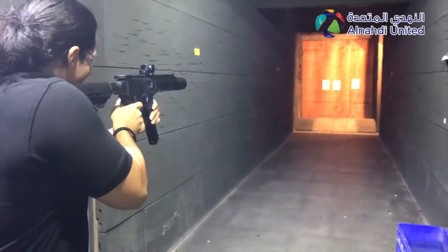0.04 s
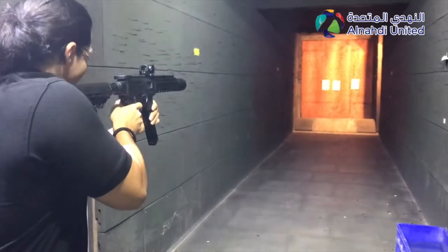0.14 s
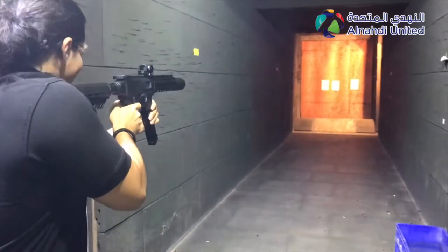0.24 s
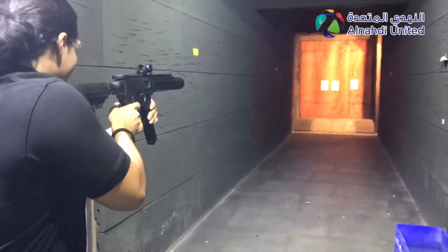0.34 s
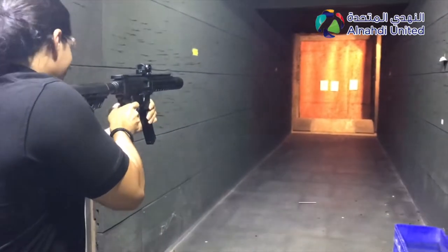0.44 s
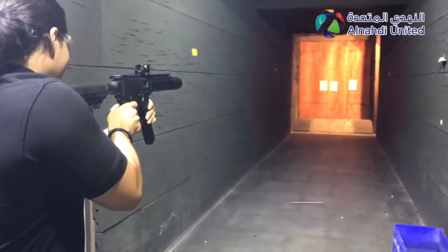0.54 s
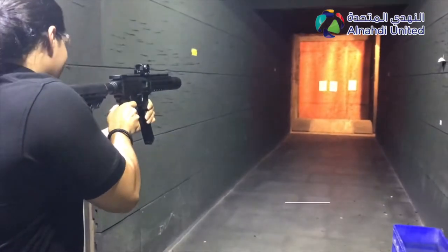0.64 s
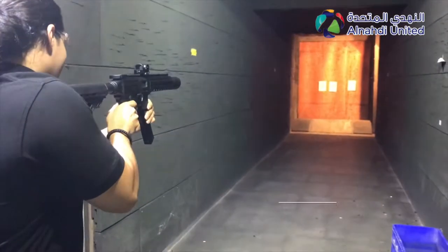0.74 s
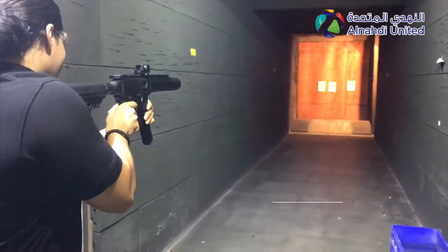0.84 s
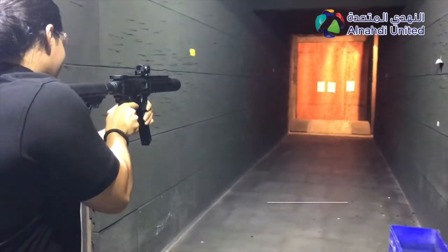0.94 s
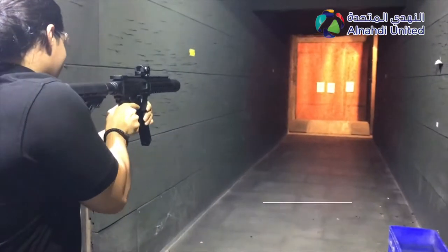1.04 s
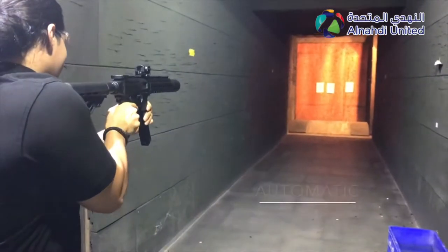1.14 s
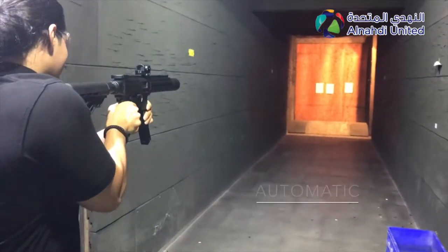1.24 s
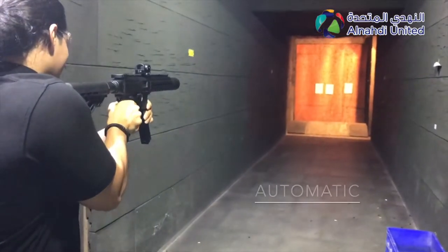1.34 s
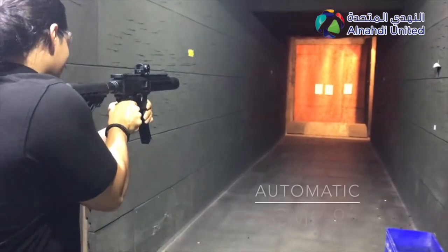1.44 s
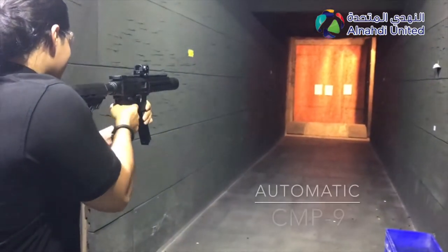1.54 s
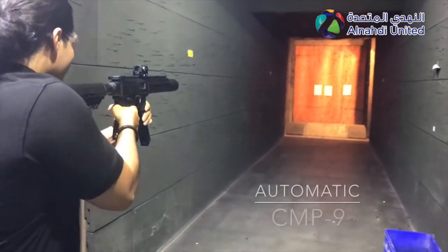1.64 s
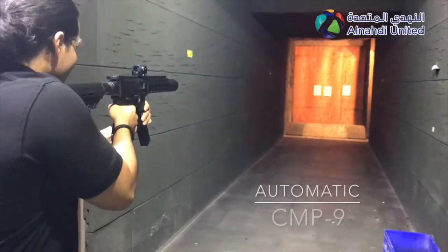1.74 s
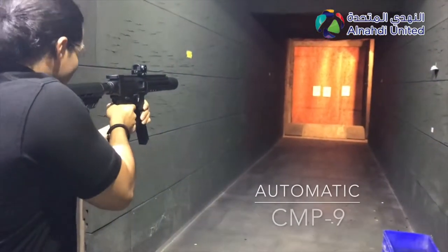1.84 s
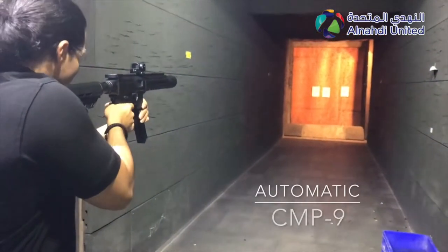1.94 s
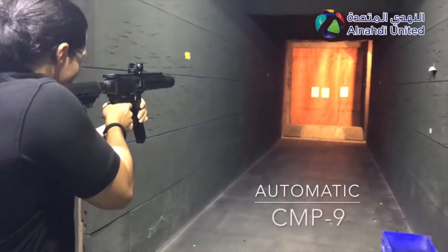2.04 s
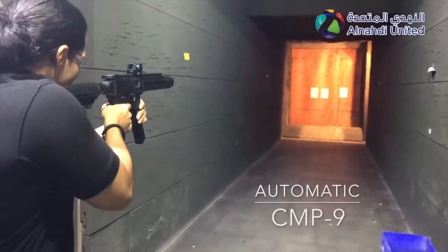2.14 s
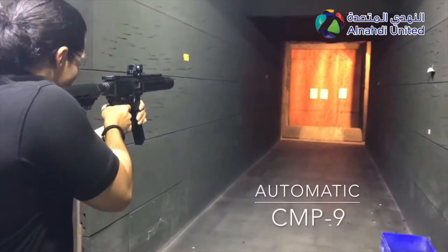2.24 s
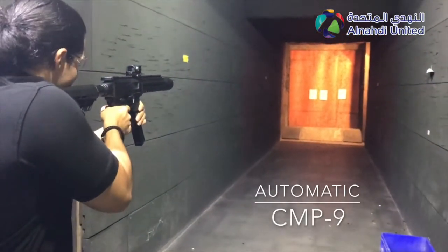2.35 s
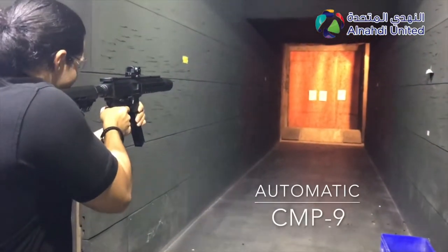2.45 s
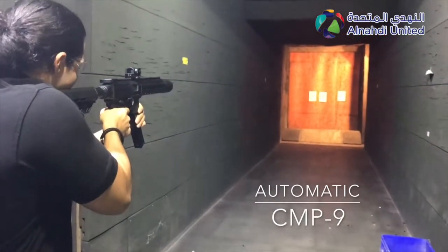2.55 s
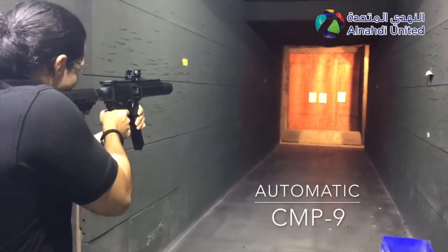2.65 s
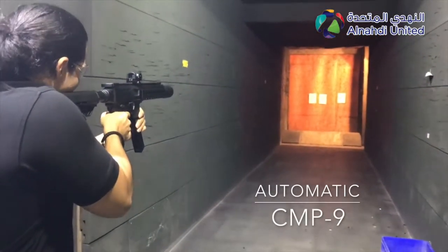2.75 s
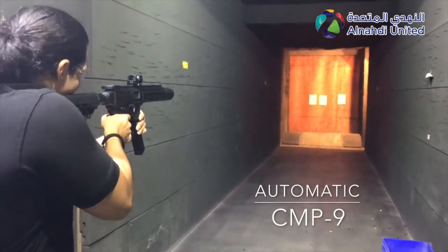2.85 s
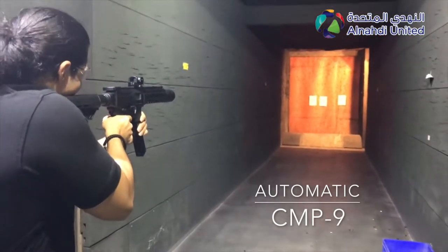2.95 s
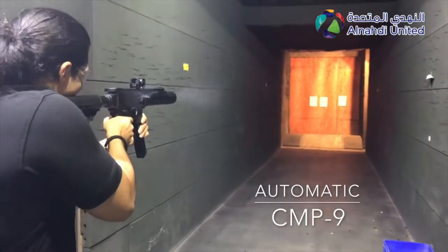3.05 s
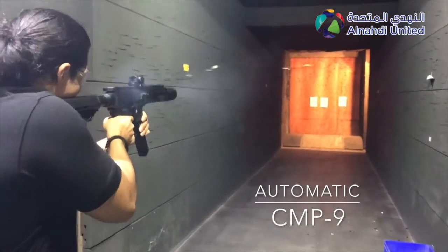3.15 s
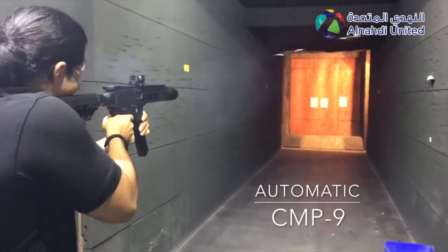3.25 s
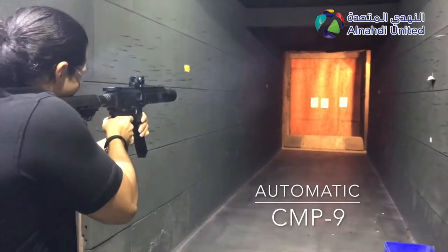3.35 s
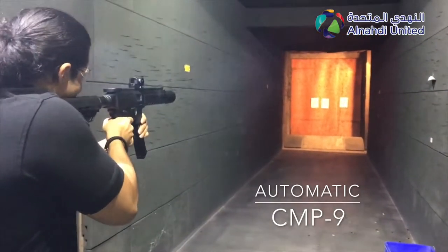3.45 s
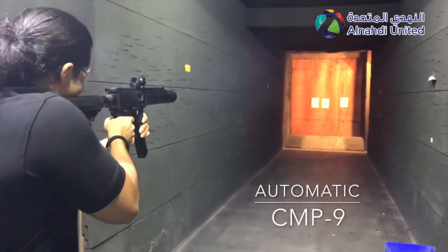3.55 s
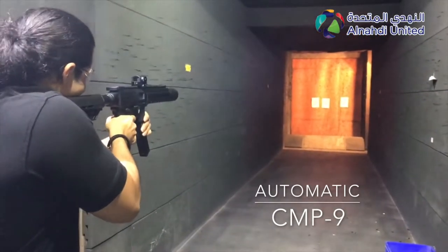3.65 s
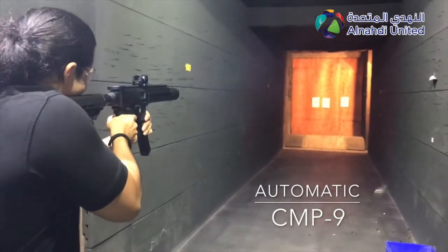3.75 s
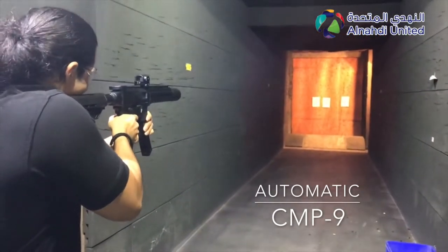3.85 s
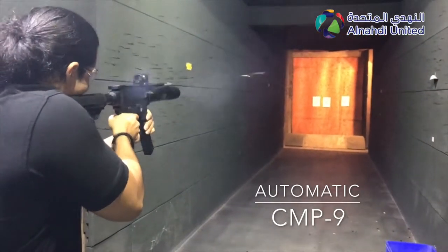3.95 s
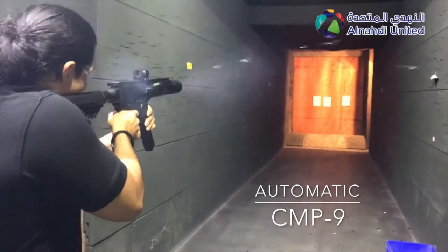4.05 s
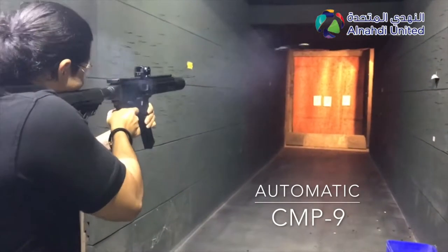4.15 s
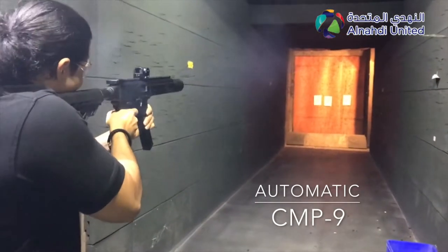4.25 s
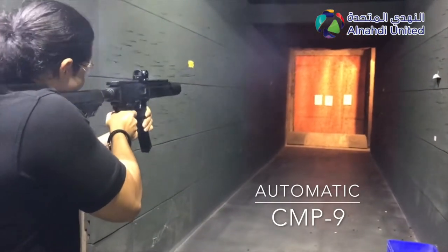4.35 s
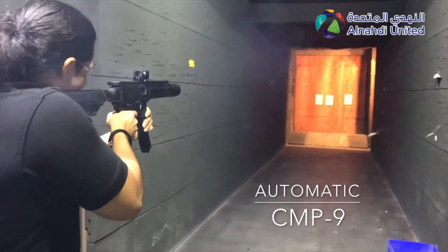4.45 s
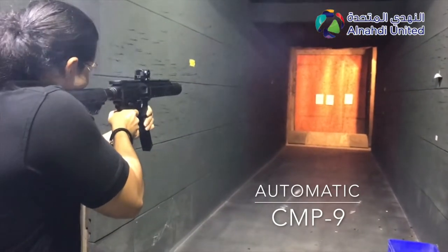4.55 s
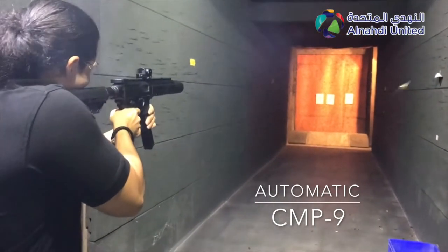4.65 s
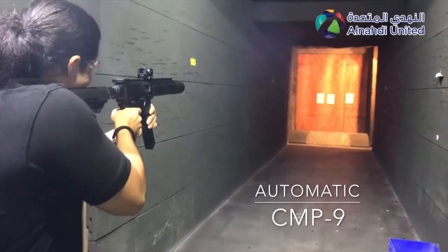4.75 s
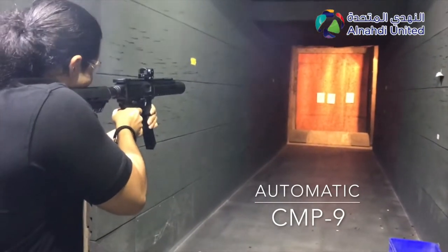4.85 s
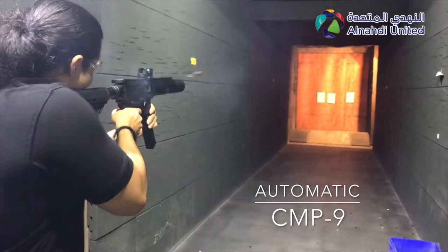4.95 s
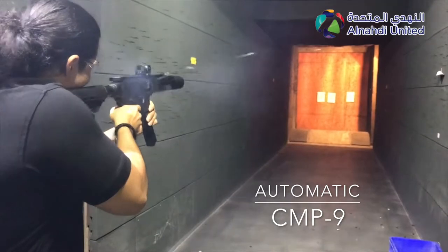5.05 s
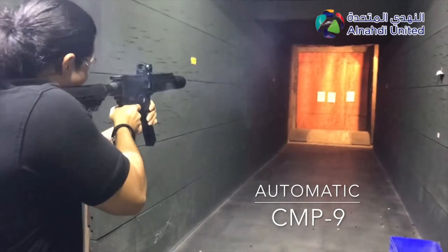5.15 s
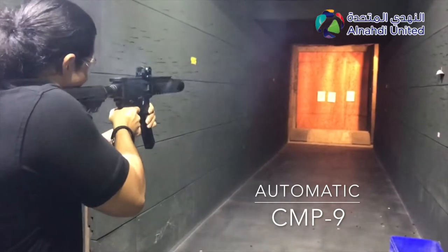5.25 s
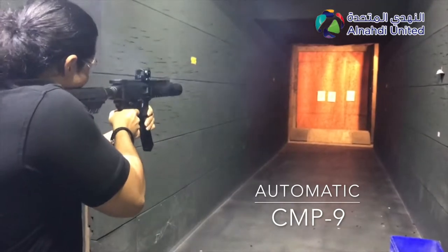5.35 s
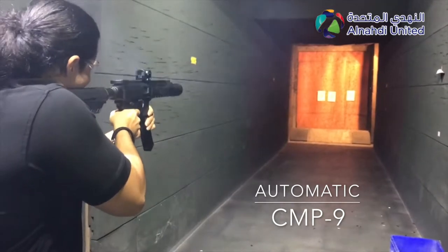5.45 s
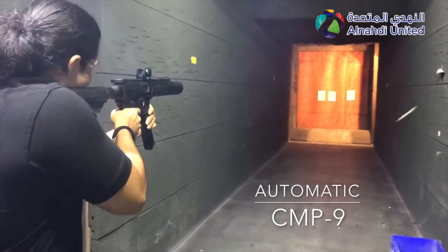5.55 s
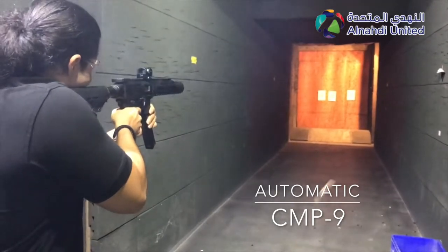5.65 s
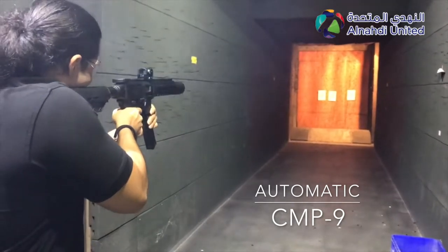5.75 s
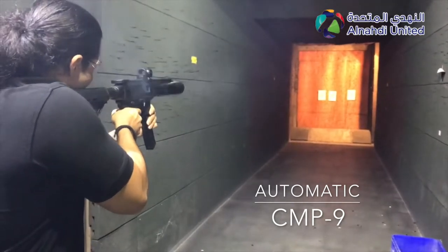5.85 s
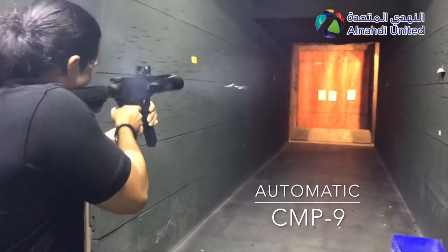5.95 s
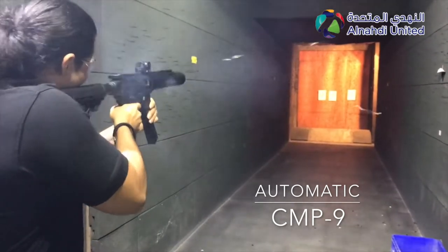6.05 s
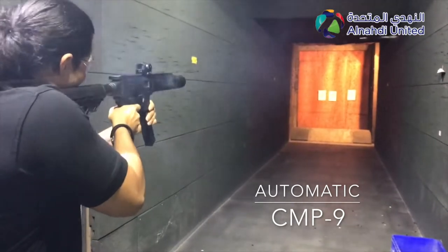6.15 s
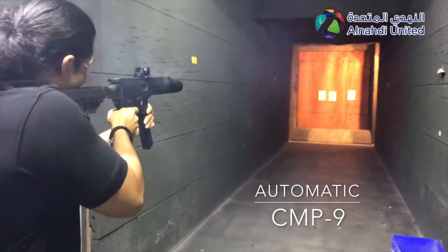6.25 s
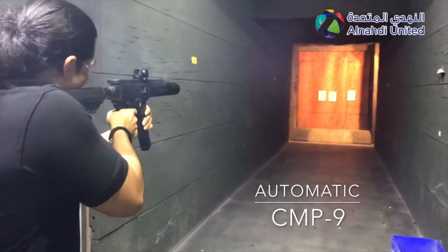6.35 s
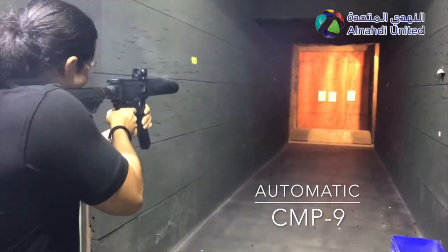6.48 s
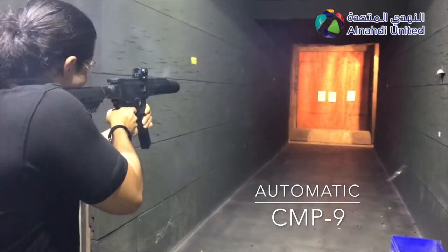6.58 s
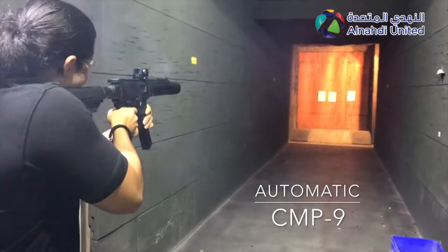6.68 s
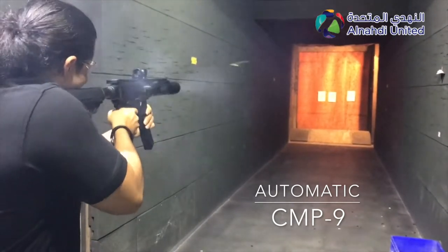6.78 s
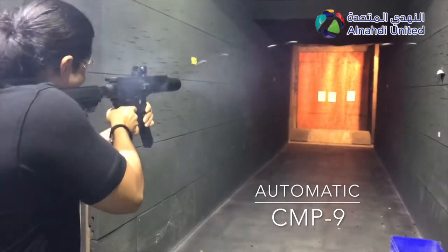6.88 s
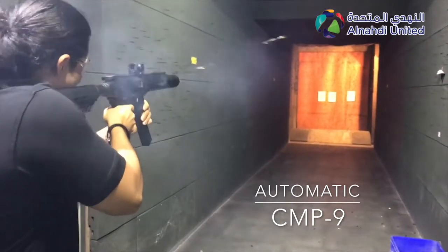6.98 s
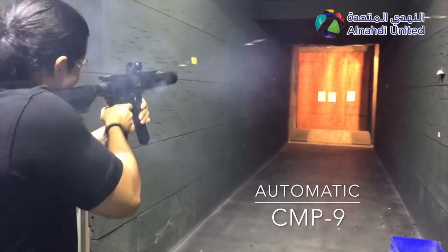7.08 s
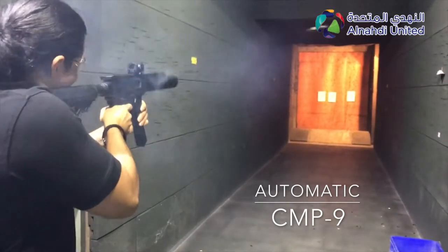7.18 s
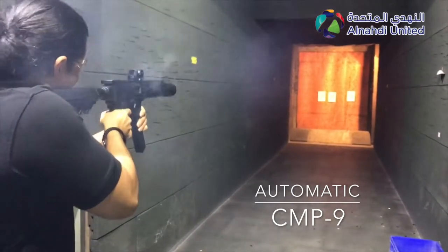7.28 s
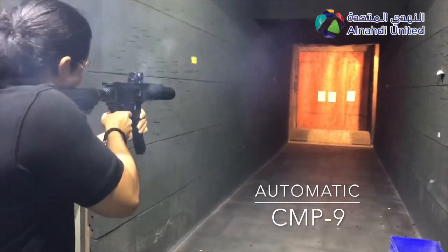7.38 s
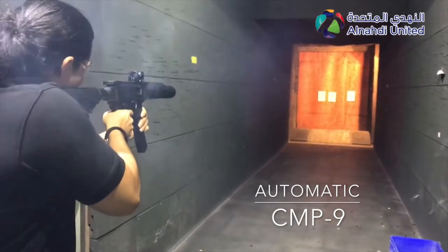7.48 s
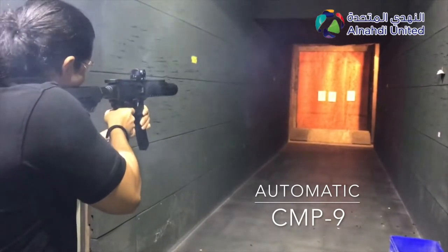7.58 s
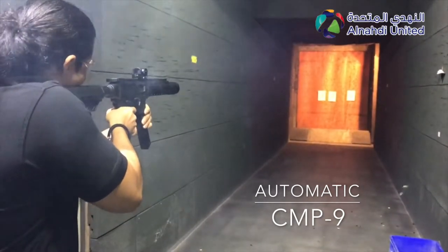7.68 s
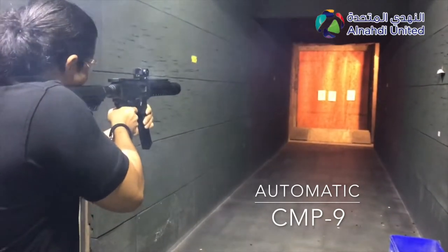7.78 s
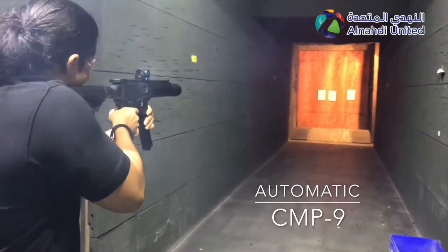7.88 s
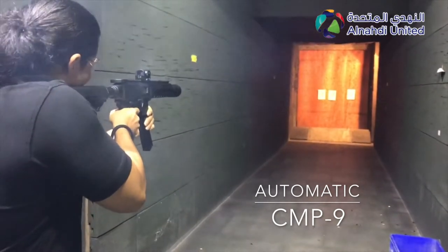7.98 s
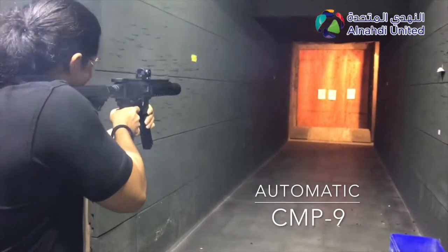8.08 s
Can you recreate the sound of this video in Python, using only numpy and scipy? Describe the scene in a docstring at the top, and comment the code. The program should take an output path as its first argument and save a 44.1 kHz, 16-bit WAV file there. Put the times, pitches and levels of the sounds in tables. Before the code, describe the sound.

Five quick bursts from a silenced submachine gun are heard up close in a reverberant concrete lane, following a stretch of low fan rumble and light handling clicks. The shots are sharp and dense, trailed by ringing steel plates, and the rumble dips after each burst. One loud metal snap comes before the third burst. It ends with thin tinkles of spent cases, soft clicks and a dull rustle of clothing.

```python
"""Suppressed submachine gun in an indoor lane.

Five short bursts go down a concrete lane; each round cracks, booms in the booth and slaps the steel trap.
Between bursts the action clicks, steel rings on and brass cases tinkle over the ventilation's rumble.
At the end the action rings open on the empty magazine and the shooter's clothes rustle.
Gain control ducks the rumble after every burst; a limiter flattens the shots."""
import sys
import numpy as np
from scipy import signal
from scipy.fft import rfft, irfft, next_fast_len
from scipy.io import wavfile
from scipy.ndimage import uniform_filter1d, minimum_filter1d, map_coordinates

SR = 44100
rng = np.random.default_rng(int(sys.argv[2]) if len(sys.argv) > 2 else 0)


def put_to_file(sound):
    """Save the sound as 16-bit audio at rate SR, in the file named by the first command-line argument."""
    columns = np.atleast_2d(sound).T  # one column per channel
    safe = np.clip(columns, -1, 1)
    whole_steps = np.round(safe * 32767)
    wavfile.write(sys.argv[1], SR, whole_steps.astype(np.int16))


N = 358091
T = np.arange(SR) / SR  # time since a blow, s


def amp(db):
    """Decibels to gain."""
    return 10 ** (np.asarray(db) / 20)


def unit(x):
    """x at rms 1."""
    return x / np.sqrt(np.mean(x ** 2) + 1e-20)


def noise(spectrum, size=SR):
    """Noise of rms 1 shaped by (freq_hz, density_db) points."""
    fft_size = next_fast_len(size)
    hz, db = np.transpose(spectrum)
    bin_hz = np.fft.rfftfreq(fft_size, 1 / SR)
    gain = amp(np.interp(np.log(bin_hz + 1), np.log(hz), db))
    return unit(irfft(rfft(rng.standard_normal(fft_size)) * gain, fft_size)[:size])


def wobble(rate_hz, size=N):
    """Smooth random curve through knots at rate_hz."""
    knots = rng.standard_normal(int(size * rate_hz / SR) + 4)
    return map_coordinates(knots, [np.arange(size) * rate_hz / SR])


def fade(t60_s, rise_s=.0003, hold_s=0):
    """Envelope of a blow: rise, plateau, exponential decay."""
    t = T[:int((hold_s + 2 * t60_s) * SR)]
    return (1 - np.exp(-t / rise_s)) * amp(-60 * np.maximum(t - hold_s, 0) / t60_s)


def onset(rise_s):
    """Exponential rise to 1."""
    return 1 - np.exp(-T / rise_s)


def puff(spectrum, envelope):
    """Coloured noise under an envelope."""
    return noise(spectrum, size=len(envelope)) * envelope


def grainy(spectrum, envelope, spiky_db):
    """A puff roughened like separate reflections of uneven strength."""
    return puff(spectrum, envelope) * unit(amp(spiky_db * wobble(1500, size=len(envelope))))


def ring(modes, scatter_db):
    """Damped modes at random phases, their levels spread by scatter_db."""
    out = np.zeros(SR)
    for (hz, db, t60_s), (strength, phase) in zip(modes, rng.standard_normal((len(modes), 2))):
        t = T[:int(t60_s * SR)]
        envelope = amp(db + scatter_db * strength - 60 * t / t60_s)
        out[:len(t)] += envelope * np.sin(2 * np.pi * (hz * t + phase))
    return out


def add(track, start_s, sound):
    """Mix a sound into the track."""
    span = track[max(round(start_s * SR), 0):][:len(sound)]
    span += sound[:len(span)]


def highpass(x, hz, order=2):
    """x without its low end."""
    return signal.sosfilt(signal.butter(order, hz, "high", fs=SR, output="sos"), x)


def ventilation():
    """Air rushes through the lane; fans and ducts add unsteady low tones."""
    air_spectrum = [(12, -33.5), (20, -12.5), (49, -1), (146, -9.5), (216, -7), (293, -14.5), (328, -16.5),
                    (377, -19.5), (513, -27), (949, -20.5), (1260, -29), (2080, -35.5), (2460, -37.5),
                    (8650, -56), (16000, -67.5)]  # rushing air: freq_hz, density_db
    duct_tones = [(48, -41.5), (58, -39), (117, -46), (213, -48.5), (333, -51.5)]  # fan and duct hum: pitch_hz, level_db
    t = np.arange(N) / SR
    air = amp(-36.5 + 1.6 * wobble(7)) * noise(air_spectrum, size=N)
    hum = sum(amp(db + 1.8 * wobble(5)) * np.sin(2 * np.pi * hz * t + .9 * wobble(6))
              for hz, db in duct_tones)
    return air + hum


def click(knock_db, catch_db=-44):
    """A small steel part snaps home, rings the catch and knocks the frame; the booth answers."""
    catch_modes = [(3670, -3.5, 0.06), (4130, -3.5, .1), (4200, -0.5, .13), (4500, 0, 0.098),
                   (6600, -3.5, 0.054), (8500, -6, .06)]  # selector catch: pitch_hz, level_db, t60_s
    snap_spectrum = [(200, -24), (1100, -15.5), (2600, -10), (3500, -0.5), (4400, 3), (5300, -3.5),
                     (6700, -4.5), (9000, -3.5), (10500, -5.5), (13000, -6.5), (16000, -6)]  # steel snap: freq_hz, density_db
    frame_spectrum = [(60, -6.5), (400, -2.5), (1300, 2), (2500, -6), (8000, -27)]  # gun frame: freq_hz, density_db
    out = amp(catch_db) * ring(catch_modes, scatter_db=-.5)
    add(out, 0, amp(4) * puff(snap_spectrum, fade(t60_s=.0053, rise_s=.0001)))
    add(out, 0, amp(-4) * puff(snap_spectrum, fade(t60_s=.051)))
    add(out, .004, amp(-19.5) * puff(snap_spectrum, fade(t60_s=.15, rise_s=.002)))
    add(out, 0, amp(knock_db) * puff(frame_spectrum, fade(t60_s=.086, rise_s=.0023)))
    return out


def handling():
    """Selector, trigger and handling clicks; small parts lack the low end."""
    clicks = [(.174, -54.5, 13, 200), (1.136, -30.5, -17, 4500), (1.404, -15.5, -22, 4000),
              (4.771, -23, -8.5, 300), (4.896, -3.5, -18.5, 502), (5.883, -30, -9, 299),
              (6.759, -36.5, -2, 300), (7.904, -38, 2.5, 200), (7.981, -31, 0.5, 200),
              (8.052, -29.5, -7, 200)]  # parts snapping home: start_s, level_db, knock_db, low_edge_hz
    out = np.zeros(N)
    for start_s, db, knock_db, low_edge_hz in clicks:
        snap = click(knock_db, catch_db=-13 + .45 * db)  # harder clicks ring the catch more
        add(out, start_s, amp(db) * highpass(snap, low_edge_hz))
    return out


def brass():
    """Each case ticks on the concrete and rings with a close, beating pair of modes."""
    cases = [(.954, -46, -52), (1.338, -59, -68), (5.495, -40, -56), (7.616, -38, -29), (7.760, -44, -32),
             (7.834, -37.5, -28), (7.848, -42, -32), (8.070, -36, -40)]  # floor contacts: start_s, ring_db, tick_db
    pitch_hz, spread_hz, beat_hz = 10880, 50, 70
    out = np.zeros(N)
    for start_s, ring_db, tick_db in cases:
        hz = pitch_hz + spread_hz * rng.standard_normal()
        tone = ring([(hz, 0, .25), (hz - beat_hz, -7, .2)], scatter_db=0) * onset(.002)
        add(out, start_s, amp(ring_db) * tone + amp(tick_db) * click(knock_db=-4.5))
    return out


def bursts():
    """Per burst: shot times, one per bolt cycle, and how hard steel and plates ring afterwards."""
    pulls = [(3.1497, 3.259, 3, -31.5, -32), (3.9883, 4.149, 4, -39, -14), (5.024, 5.136, 3, -35, -25),
             (5.9334, 6.099, 4, -38, -12.5), (6.8323, 7.162, 7, -38.5, -11.5)]  # trigger pulls: first_s, last_s, rounds, steel_db, plate_db
    return [(np.linspace(first_s, last_s, round(rounds)), steel_db, plate_db)
            for first_s, last_s, rounds, steel_db, plate_db in pulls]


def trigger():
    """Trigger and hammer click just ahead of each burst."""
    out = np.zeros(N)
    for shots_s, _, _ in bursts():
        add(out, shots_s[0] - .0225, amp(-35.5) * click(knock_db=-1))
        add(out, shots_s[0] - .017, amp(-36) * click(knock_db=-13.5))
        add(out, shots_s[0] - .008, amp(-22) * click(knock_db=-12.5))
    return out


def gunfire():
    """Each round: boom in the booth, crack, lane reverberation, bolt clatter, bullet in the trap."""
    boom = [(30, -8), (80, -4), (150, 3), (210, -1.5), (310, -0.5), (480, -0.5), (900, -0.5), (1500, 1.5),
            (2500, -6.5), (4000, -10), (9000, -22), (16000, -30)]  # muzzle boom: freq_hz, density_db
    booth_modes = [(124.6, -7, 0.32), (145.7, -6.5, 0.41), (180, -10.5, 0.2), (336.7, -3, 0.26),
                   (482, -6, 0.47), (564, -8, 0.28), (632, -3, 0.52), (661.6, 1.5, 0.27), (923, -3.5, 0.37),
                   (1150, -12, 0.23), (1178, -1.5, 0.19), (1260, -5, 0.32), (1470, -5, 0.22),
                   (1590, -0.5, 0.5), (1953, -0.5, 0.28), (3040, -2.5, 0.31), (3573, 0.5, .3)]  # firing booth resonances: pitch_hz, level_db, t60_s
    crack = [(100, -27), (700, -12), (1800, -9), (3300, 1.5), (4800, -4), (6500, -2.5), (8700, -4),
             (10400, -9), (11800, -6), (16000, -5.5)]  # sharp crack: freq_hz, density_db
    tail = [(40, -12), (140, 0), (350, -11.5), (800, 0), (1300, 1.5), (2100, -3.5), (3000, -6), (5000, -9),
            (7000, -9.5), (10000, -12.5), (16000, -17.5)]  # lane reverberation: freq_hz, density_db
    trap = [(100, -24), (600, -9), (1200, 4.5), (1700, 3), (2100, 2.5), (2700, -6.5), (4000, -1.5),
            (6300, -6.5), (10000, -12.5), (16000, -21)]  # bullet impact: freq_hz, density_db
    boom_envelope = fade(t60_s=.16, rise_s=.0069, hold_s=.013)
    # muzzle and walls stay put, so these reflections repeat from shot to shot
    walls = puff(boom, boom_envelope)
    booth = amp(-18) * ring(booth_modes, scatter_db=-1.5) * onset(.0055)
    push = amp(-8) * np.sin(2 * np.pi * 140 * T) * amp(-60 * T / .025)
    slap = puff(trap, fade(t60_s=.025, rise_s=.00046, hold_s=.0028))
    out = np.zeros(N)
    for shot_s in np.concatenate([shots_s for shots_s, _, _ in bursts()]):
        add(out, shot_s, amp(-4) * (walls + .57 * puff(boom, boom_envelope)))
        add(out, shot_s, booth + push)
        add(out, shot_s, grainy(crack, fade(t60_s=.083, hold_s=.011), spiky_db=2))
        add(out, shot_s, amp(-1) * grainy(crack, fade(t60_s=.025), spiky_db=-1.5))
        add(out, shot_s, amp(-20) * puff(tail, fade(t60_s=.75, rise_s=.025)))
        # the bolt runs forward and strips the next round
        bolt = grainy(crack, fade(t60_s=.11, rise_s=.002, hold_s=.01), spiky_db=4)
        add(out, shot_s + .038, amp(-15) * bolt)
        # the impact returns from the far end
        fragments = grainy(crack, fade(t60_s=.0088), spiky_db=4)
        plate_rumble = puff(trap, fade(t60_s=.35, rise_s=.0097, hold_s=.029))
        add(out, shot_s + .075, amp(-6.5) * slap)
        add(out, shot_s + .0765, amp(-8) * fragments)
        add(out, shot_s + .083, amp(-18) * plate_rumble)
    return out


def shimmer(count):
    """The many weak, close modes of sheet steel."""
    pitches, lives = rng.random((2, count))
    modes = [(1100 * 4 ** pitch, -10 * pitch, .5 + .5 * life) for pitch, life in zip(pitches, lives)]
    return ring(modes, scatter_db=3)


def steel_ring():
    """After each burst the trap's loose plates clang and rattle; gun and lane steel rings on."""
    plate_modes = [(850, -6.5, 0.34), (1170, -8, 0.5), (1570, -1, 0.28), (1980, 0.5, 0.36),
                   (2030, 10, 0.16), (2200, 0, 0.39), (2250, -12, 0.241), (4030, -5.5, 0.43),
                   (6450, -3.5, 0.31)]  # trap plates: pitch_hz, level_db, t60_s
    steel_modes = [(424, -9.5, 3.5), (1127, 1.5, 1.3), (1180, -4.5, 1.1), (2160, -3, 1.1), (2320, 4, 0.65),
                   (2760, -10, 1.2), (3460, -10.5, 1.4), (3560, -5.5, 1.3), (3740, -1.5, 0.86),
                   (5720, -9, 1), (5980, -3, .9), (7000, -14.5, 1.4), (6950, -11, 0.85), (8140, -9.5, 0.49),
                   (8800, -15.5, 1.7), (9500, -10.5, 1), (11160, -4.5, 1.1), (11095, -10.5, 1.1),
                   (12425, -13.5, 1.5), (13450, -14, 1.2)]  # gun and lane steel: pitch_hz, level_db, t60_s
    delay_s = .088
    out = np.zeros(N)
    for shots_s, steel_db, plate_db in bursts():
        clang = ring(plate_modes, scatter_db=0) * amp(2.7 * wobble(90, size=SR))
        steel = ring(steel_modes, scatter_db=3.5) + amp(-4.5) * shimmer(count=24)
        ringing = amp(steel_db) * steel + amp(plate_db - 8.5) * clang
        add(out, shots_s[-1] + delay_s, ringing * onset(.0079))
    return out


def empty_action(start_s):
    """The action rings open on the empty magazine."""
    action_modes = [(2690, -0.5, 0.55), (3820, 6.5, 0.47), (4086, -2, 0.45), (5728, -8, .7),
                    (8909, -13, 0.55), (9340, -11, 0.66), (11310, -18, .7), (13884, -14, 0.88),
                    (14766, -21, .8)]  # open action: pitch_hz, level_db, t60_s
    out = np.zeros(N)
    add(out, start_s, amp(-25) * ring(action_modes, scatter_db=.5) * onset(.032))
    return out


def shuffle(start_s):
    """Clothes rustle dully as the shooter shifts stance."""
    cloth = [(30, -8), (70, 0), (280, -1), (500, -18), (1200, -22), (4000, -40), (16000, -60)]  # rustle: freq_hz, density_db
    out = np.zeros(N)
    add(out, start_s, amp(-35) * puff(cloth, fade(t60_s=.3, rise_s=.03, hold_s=.1)))
    return out


def scene():
    """Everything as it reaches the microphone, mono."""
    gun = gunfire() + trigger() + steel_ring() + empty_action(start_s=7.3) + handling()
    return (gun + brass() + shuffle(start_s=8.03) + ventilation())[None]


def lag(x, tau_s):
    """One-pole smoothing."""
    pole = np.exp(-1 / (tau_s * SR))
    return signal.lfilter([1 - pole], [1, -pole], x)


def release(cut_db, db_per_s):
    """A gain cut that lets go at a steady rate."""
    ramp_db = db_per_s * np.arange(N) / SR
    return np.maximum.accumulate(cut_db + ramp_db) - ramp_db


def gain_control(x, threshold_db, depth_db, hold_s, attack_s, recovery_db_per_s):
    """Loud sound turns the gain down; it waits, then comes back."""
    level_db = 10 * np.log10(lag(x ** 2, .019) + 1e-12)
    cut_db = np.clip(level_db - threshold_db, 0, depth_db)
    half_hold = int(hold_s * SR / 2)
    held_db = -minimum_filter1d(-cut_db, 2 * half_hold + 1, origin=half_hold, mode="nearest")
    return x * amp(-lag(release(held_db, recovery_db_per_s), attack_s))


def limiter(x, ceiling_db):
    """Looks a little ahead and lets go fast, so overloud shots merge into one dense blast."""
    level_db = 10 * np.log10(np.abs(uniform_filter1d(x ** 2, size=130)) + 1e-12)
    cut_db = release(np.maximum(level_db - ceiling_db, 0), db_per_s=520)
    return x * amp(-uniform_filter1d(cut_db, size=40))


def record(dry):
    """Bass roll-off, slow gain control, fast limiter, short fade-in, soft clipping, band limit."""
    fade_in_s, clip_level, top_hz = .12, .47, 15800
    x = highpass(dry[0], 32, order=4)
    x = gain_control(x, threshold_db=-16.5, depth_db=15.5, hold_s=.38, attack_s=.075, recovery_db_per_s=31)
    x = limiter(x, ceiling_db=-14.5)
    x *= np.minimum(np.arange(N) / SR / fade_in_s, 1) ** .5
    x /= (1 + (x / clip_level) ** 4) ** (1 / 4)
    return signal.sosfilt(signal.ellip(8, .3, 70, top_hz, fs=SR, output="sos"), x)[None]


dry = scene()
out = record(dry)
put_to_file(out)
```